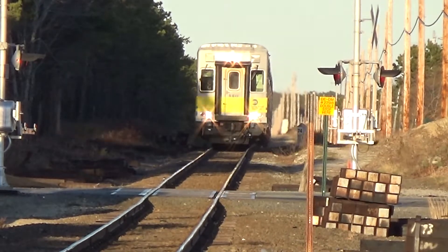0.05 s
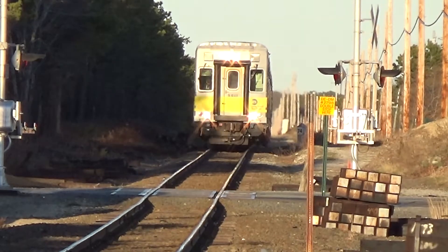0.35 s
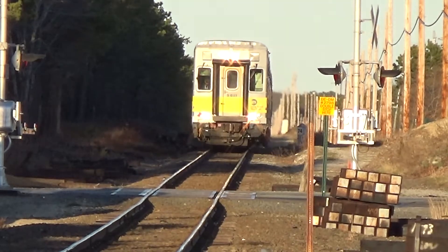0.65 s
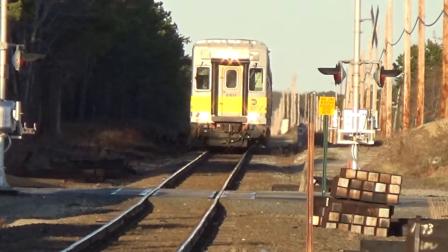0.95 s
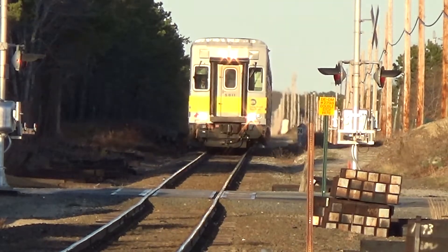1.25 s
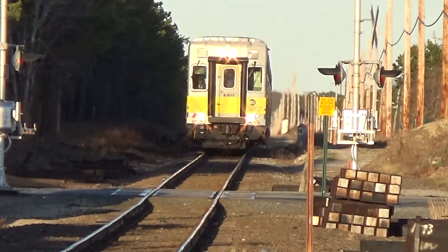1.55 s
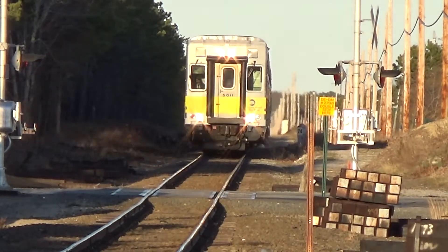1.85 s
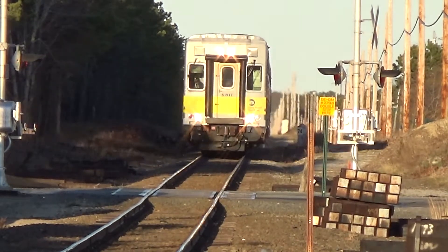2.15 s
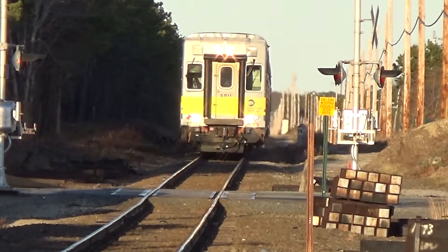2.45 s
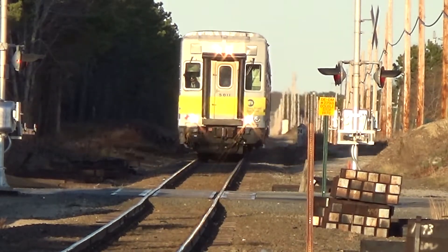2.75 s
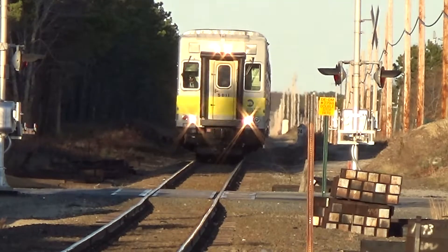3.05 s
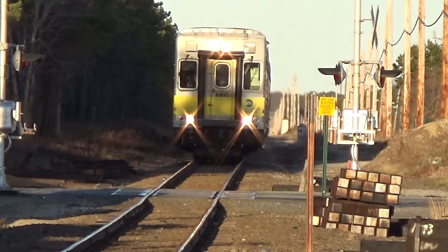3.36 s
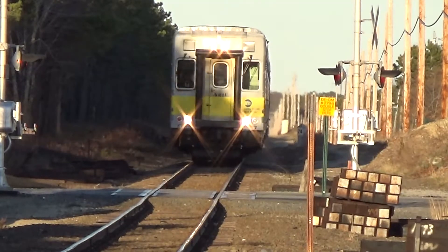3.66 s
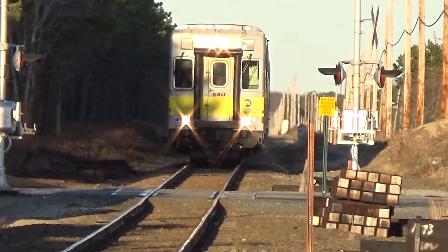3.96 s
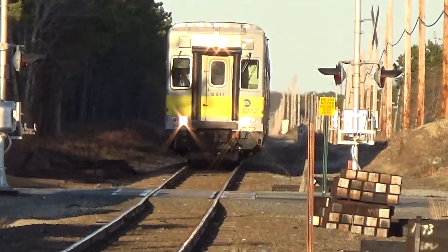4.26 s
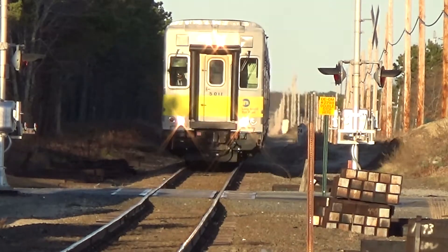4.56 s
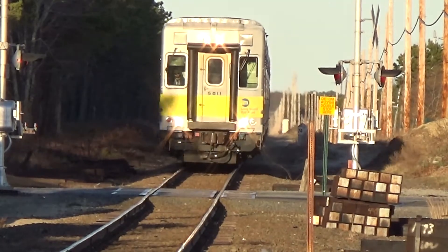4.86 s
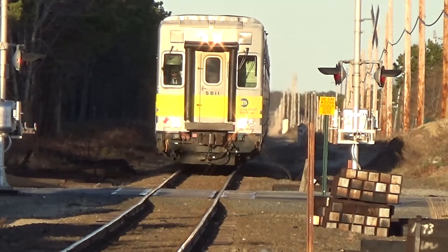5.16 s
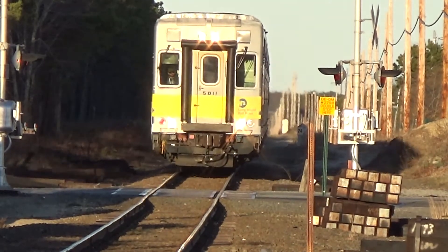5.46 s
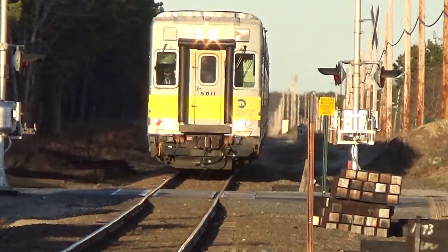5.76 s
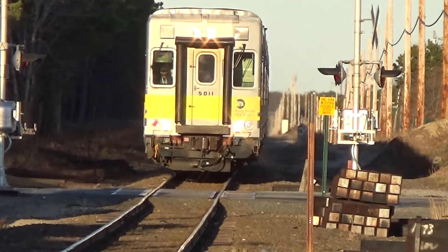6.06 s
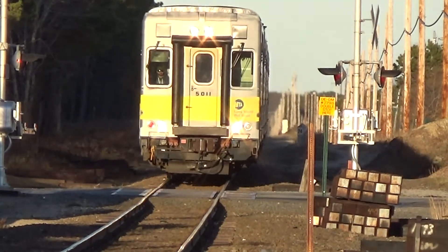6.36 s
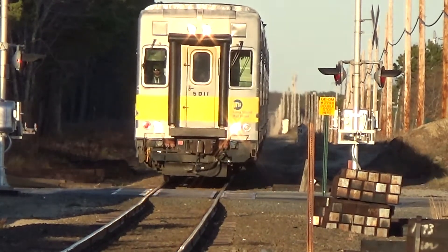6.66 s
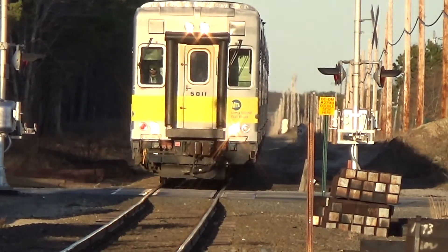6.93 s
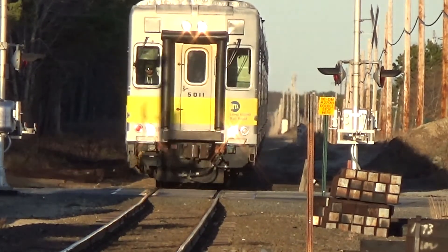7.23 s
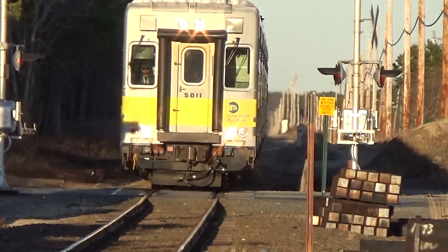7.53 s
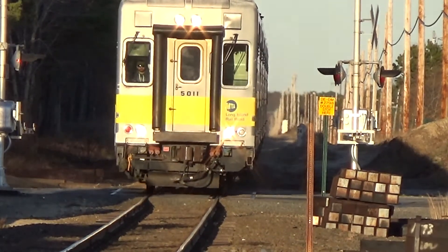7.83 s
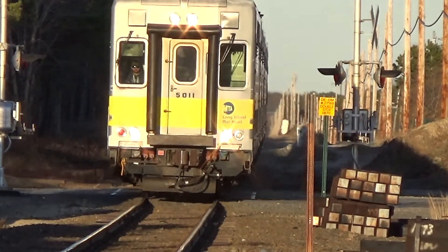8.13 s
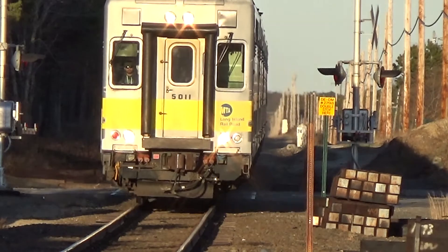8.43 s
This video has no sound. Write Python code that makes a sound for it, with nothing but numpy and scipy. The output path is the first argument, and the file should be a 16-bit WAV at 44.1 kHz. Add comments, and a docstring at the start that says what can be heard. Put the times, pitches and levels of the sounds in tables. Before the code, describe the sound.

Faint wheel rumble, outdoor hiss and soft camera ticking come first. After about three seconds an approaching train sounds its raspy two-note air horn: two short, spaced blasts, then a quick toot running into a longer, brighter blast. Each one echoes through the surrounding woods and lingers, slightly lower in pitch. Light gusts brush the microphone beside the track.

```python
"""A commuter train's two-bell air horn sounds four times as it nears a level crossing through woods.
Air-driven diaphragms give two harmonic series, their sum tones and a rasp. Trees throw the blasts back,
lower in pitch the further behind the moving train they stand. Far wheels rumble under hiss and two faint
tones, gusts brush the microphone, and a camera's lens motor ticks."""
import sys
import numpy as np
from scipy import signal
from scipy.fft import rfft, irfft, next_fast_len
from scipy.io import wavfile

SR = 44100
rng = np.random.default_rng(int(sys.argv[2]) if len(sys.argv) > 2 else 0)


def to_wav(s):
    """Save 16-bit WAV."""
    ch = np.atleast_2d(s).T  # columns
    pcm = np.round(np.clip(ch, -1, 1) * 32767)  # PCM
    wavfile.write(sys.argv[1], SR, pcm.astype(np.int16))


N = 374409

# distant wheels (time [s], level [dB])
WHEEL_LEVEL = [(0, -62.5), (.6, -62.5), (1.5, -66), (2.5, -65), (3.4, -63), (5, -56), (6.5, -58),
               (7.1, -57), (8.49, -49)]
# hiss (time [s], relative level [dB])
HISS_CONTOUR = [(0.0, -73), (2.03, -75), (2.81, -76), (3.83, -74.5), (4.16, -73.5), (4.7, -73.5),
                (5.63, -71), (6.36, -73.5), (7.21, -73.5), (7.61, -72), (8.49, -70)]
# noise spectra (frequency [Hz], relative density [dB])
WHEEL_SPECTRUM = [(88, -31), (150, -28.5), (370, -13), (404, -8), (458, -10.5), (506, -3.5), (566, -7.5),
                  (983, -8.5), (1660, -20.5), (3000, -25.5), (3900, -35.5), (6600, -120)]
HISS_SPECTRUM = [(1000, 9.5), (2500, 4), (4000, 4.5), (6000, 2.5), (9000, 1.5), (12000, -0.5),
                 (15500, -1.5)]
WIND_SPECTRUM = [(15, -59), (25, -32), (75, -3), (114, -4.5), (173, -1.5), (237, -5), (325, -5.5),
                 (479, -13.5), (657, -22), (900, -31), (1170, -45), (1980, -120)]
RUSH_SPECTRUM = [(300, -22), (700, 6.5), (2800, -5.5), (4600, -6), (5600, -37), (7000, -32), (10000, -35.5),
                 (13000, -66.5)]
# stereo width (frequency [Hz], side gain [dB])
AIR_SIDE = [(60, -10.5), (200, -9.5), (400, -17.5), (700, -11), (1300, -5.5), (2400, -4.5), (4400, -5),
            (8000, -12), (10000, -26.5), (15000, -19.5)]
WIND_SIDE = [(60, -15), (110, -10), (200, -8.5), (380, -4.5), (700, 3.5)]
HORN_SIDE = [(400, -13.5), (900, -14.5), (1400, -13), (2500, -10.5), (4400, -28), (8000, -39.5)]
ECHO_SIDE = [(380, -7.5), (700, -1.5), (1300, -0.5), (2400, 3.5), (4400, -2.5), (9000, -7.5)]
# far tones (start [s], stop [s], start pitch [Hz], end pitch [Hz], level [dB])
FAR_GLIDES = [(1.98, 2.188, 497, 502, -67.5), (3.107, 3.47, 2820, 2680, -76.5)]
# lens motor (start [s], stop [s], tick level [dB], tick pitch [Hz])
MOTOR_RUNS = [(0.029, 1.397, -59, 3400), (1.898, 4.0, -61.5, 3480), (4.367, 5.02, -58.5, 3450),
              (5.033, 8.45, -62.5, 3595)]
# camera clicks (time [s], peak [dB], low cut [Hz])
HOUSING_CLICKS = [(1.415, -46.5, 1800), (1.865, -50, 1490), (4.017, -46.5, 1850), (5.582, -48.5, 7980),
                  (5.601, -45, 6800)]
# camera housing (frequency [Hz], bandwidth [Hz], gain [dB])
HOUSING_MODES = [(2540, 240, 1), (3180, 280, 3.5), (6000, 2200, -18), (9100, 510, -15)]
# breeze (time [s], level [dB])
BREEZE_LEVEL = [(0, -57), (0.65, -60.5), (1.1, -62), (1.9, -73.5), (2.9, -83.5), (3.8, -75), (4.6, -66),
                (5.4, -62), (5.85, -67.5), (6.5, -68), (7.0, -71), (7.15, -56.5), (7.9, -68), (8.49, -72)]
# gusts (centre [s], length [s], peak [dB])
WIND_GUSTS = [(0.216, 0.055, -50), (0.356, 0.049, -54), (0.482, 0.031, -50.5), (0.95, 0.08, -64),
              (3.12, 0.14, -68), (3.517, 0.11, -66), (3.66, 0.034, -62), (4.198, 0.03, -58),
              (4.353, 0.069, -56.5), (4.63, 0.11, -48.5), (4.717, 0.062, -45), (4.772, 0.063, -41),
              (4.838, 0.057, -40.5), (4.903, 0.046, -49), (5.068, 0.1, -42), (5.191, 0.043, -42.5),
              (5.283, 0.04, -64), (5.471, 0.063, -47.5), (5.73, 0.1, -61.5), (5.97, 0.065, -65),
              (6.235, 0.086, -56.5), (6.397, 0.032, -58), (6.546, 0.05, -57), (6.747, 0.075, -57),
              (6.82, 0.083, -47.5), (7.227, 0.1, -63), (7.37, 0.053, -61)]
# reflection filters (frequency [Hz], gain [dB])
TREE_FILTER = [(320, 1), (460, 6.5), (660, 5.5), (950, 1.5), (1400, 4.5), (2000, -7.5), (2800, -5),
               (3600, -8), (5000, -7.5), (10000, -12)]
SLAP_FILTER = [(500, 1), (950, -1.5), (1400, -0.5), (2000, -8), (3000, -11), (5000, -18), (8000, -14)]
# tree echo strength (angle from ahead [deg], relative level [dB])
ECHO_BY_ANGLE = [(0, 10.5), (20, 3), (50, 3), (90, 0), (130, -19.5), (180, 7.5)]
# strong single reflectors (delay [s], angle from ahead [deg], gain [dB])
SURFACES = [(.12, 89, -8.5), (.24, 120, -10), (.33, 165, -14)]
# the bells beam treble ahead (angle from ahead [deg], cutoff [Hz])
BEAM_CUTOFF = [(0, 7000), (50, 11400), (90, 1840), (130, 1200), (180, 1770)]
# two overtone bands on the direct path (time [s], bite gain [dB], blare gain [dB])
BAND_SWELLS = [(3.47, -5.5, -0.5), (3.55, 4.5, 3), (3.64, 8.5, 6), (3.7, 1.5, 0), (5.02, -1, -1),
               (5.17, 1, -0.5), (7.24, -8.5, -1), (7.48, -1, 2.5), (7.58, -12, -0.5), (7.65, -1, 3.5),
               (7.74, 9.5, -4.5), (7.82, 2, -5.5)]
# first harmonics, a row each (far level [dB], near level [dB])
HIGH_HARMONICS = [(-13.5, -18), (2, -11), (-17.5, -8), (-14, -5.5), (-17, -7.5), (-13.5, -15), (-16, -20.5),
                  (-20.5, -23), (-27.5, -28), (-38.5, -27.5), (-33.5, -39), (-40, -37)]
LOW_HARMONICS = [(-28.5, -21), (-15.5, -14.5), (-13.5, -8.5), (-10.5, -14), (-16, -14.5), (-17, -11.5),
                 (-21, -19.5), (-18, -21), (-26, -23), (-15.5, -32), (-23.5, -23.5), (-42, -26.5)]
# envelopes of higher harmonics and of sum tones (frequency [Hz], level [dB])
UPPER_HARMONICS = [(4000, -30.5), (5000, -29.5), (6000, -40.5), (7000, -52), (8500, -54.5), (10500, -61.5),
                   (12000, -86)]
SUM_ENVELOPE = [(780, -23.5), (1500, -22), (2700, -21.5), (3500, -26.5), (4500, -31), (6000, -41.5),
                (8000, -48), (10500, -67), (12000, -91.5)]
# low bell's harmonics 1, 2, ... in the sum tones (weight [dB])
SUM_WEIGHTS_DB = [-11.5, 0.5, -2, -7.5, -6, -8, -8, -8]
# blasts (full tone [s], valve shuts [s], high bell pitch [Hz], starts sharp by [Hz], direct gain [dB],
# nearness [0-1], body [dB], blare [dB], rasp [dB], edge [dB], fizz [dB], echo gain [dB])
HORN_BLASTS = [ (3.458, 3.688, 460.3, 18.5, -27.5, 0.27, -3, 0.5, -2, -6, -14, -37),
               (5.007, 5.166, 460.9, 12.27, -24.5, 0.23, 3.0, -0.5, 2.5, -3, -7.5, -31),
               (7.187, 7.283, 459.8, 13.55, -18, 0.49, -7.5, -8.5, -1.5, 2, -1.5, -25.5),
               (7.436, 7.815, 459.5, 5.94, -21.5, 0.94, 1.5, -3.5, 0.5, 1.5, 3.5, -25), ]

TRAIN_MACH = .066
LOW_BELL_RATIO = .7195
LEAD_S = .025  # onset to full tone


def from_db(db):
    """Decibels to amplitude."""
    return 10 ** (np.asarray(db) / 20)


def unit_rms(x):
    """Scales to rms 1."""
    return x / np.sqrt(np.mean(x ** 2) + 1e-20)


def lookup(rows, at):
    """Interpolates the other columns along the first."""
    axis, *columns = np.transpose(rows)
    return [np.interp(at, axis, column) for column in columns]


def at_hz(points, hz):
    """Reads a spectrum on a log-frequency axis."""
    f, value = np.transpose(points)
    return np.interp(np.log(np.maximum(hz, 1)), np.log(f), value)


def drift(rate_hz, size=N):
    """Smooth random wander, rms about 1."""
    r = np.exp(-200 * np.pi * rate_hz / SR)
    slow = signal.lfilter([1], [1, -2 * r, r * r], rng.standard_normal(N // 100 + 1002))[1000:]
    return np.interp(np.arange(size) / 100, np.arange(len(slow)), unit_rms(slow))


def coloured(x, spectrum):
    """Zero-phase filter with a smooth spectrum."""
    size = next_fast_len(x.shape[-1])
    gain = from_db(at_hz(spectrum, np.fft.rfftfreq(size, 1 / SR)))
    return irfft(rfft(x, size) * gain, size)[..., :x.shape[-1]]


def stereo(mid, side, width):
    """Left and right from mid and filtered side."""
    side = coloured(side, width)
    return np.array([mid + side, mid - side])


def stereo_noise(spectrum, width):
    """Coloured stereo noise, rms 1."""
    mid, side = rng.standard_normal((2, N))
    return unit_rms(coloured(stereo(mid, side, width), spectrum))


def resonance(x, hz, width_hz):
    """Two-pole resonator, peak gain 1."""
    r = np.exp(-np.pi * width_hz / SR)
    feedback = [1, -2 * r * np.cos(2 * np.pi * hz / SR), r * r]
    return signal.lfilter(np.array([1, 0, -1]) * (1 - r * r) / 2, feedback, x + 1e-18)


def add(track, sound, start_s):
    """Mixes a sound into a track."""
    i = min(max(int(start_s * SR), 0), N)
    track[..., i:i + sound.shape[-1]] += sound[..., :N - i]


def hiss(t, gain_db=6.5):
    """Even outdoor hiss."""
    return from_db(lookup(HISS_CONTOUR, t)[0] + gain_db) * stereo_noise(HISS_SPECTRUM, AIR_SIDE)


def wheels(t):
    """Far wheels roll on the rails, louder towards the end."""
    return from_db(lookup(WHEEL_LEVEL, t)[0]) * stereo_noise(WHEEL_SPECTRUM, AIR_SIDE)


def far_tones(waver=.0036):
    """Two thin, wavering tones swell and fade."""
    out = np.zeros(N)
    for start_s, stop_s, start_hz, end_hz, db in FAR_GLIDES:
        size = int((stop_s - start_s) * SR)
        hz = np.linspace(start_hz, end_hz, size) * (1 + waver * drift(40, size))
        tone = np.sin(2 * np.pi * np.cumsum(hz) / SR)
        add(out, from_db(db) * signal.windows.tukey(size, .5) * tone, start_s)
    return out


def lens_motor(period_s=1001 / 30000, rise_s=.0012, scatter_hz=60, uneven_db=2, right_phase_rad=.57):
    """The motor ticks once a period: a short chirp with a dry rattle."""
    out = np.zeros((2, N))
    t = np.arange(SR // 25) / SR
    variation = rng.standard_normal((N // 1000, 2))
    grit = rng.standard_normal((N // 1000, 2, len(t)))
    envelope = t / rise_s * np.exp(1 - t / rise_s)
    phase_rad = np.array([[0], [right_phase_rad]])
    for start_s, stop_s, db, tick_hz in MOTOR_RUNS:
        for time_s in np.arange(start_s, stop_s, period_s):
            tick = int(time_s / period_s)
            force, speed = variation[tick]
            chirp = envelope * np.sin(2 * np.pi * (tick_hz + scatter_hz * speed) * t + phase_rad)
            rattle = from_db(-3) * resonance(envelope * grit[tick], hz=2600, width_hz=700)
            add(out, from_db(db + uneven_db * force) * (chirp + rattle), time_s)
    return out


def housing_clicks(decay_s=.0028):
    """Sharp clicks ring the camera housing."""
    out = np.zeros(N)
    t = np.arange(SR // 25) / SR
    for time_s, peak_db, low_cut_hz in HOUSING_CLICKS:
        burst = rng.standard_normal(len(t)) * np.exp(-t / decay_s)
        ring = sum(from_db(db) * resonance(burst, hz, width_hz) for hz, width_hz, db in HOUSING_MODES)
        click = signal.sosfilt(signal.butter(2, [low_cut_hz, 11500], "band", fs=SR, output="sos"), ring)
        add(out, from_db(peak_db) * click / np.abs(click).max(), time_s)
    return out


def wind(t, flutter_db=1.7, eddy_db=1.6):
    """Breeze and gusts on the microphone; eddies make both lumpy."""
    breeze = from_db(lookup(BREEZE_LEVEL, t)[0] + flutter_db * drift(12))
    gusts = sum(from_db(db) / (1 + (2 * (t - centre_s) / length_s) ** 4)
                for centre_s, length_s, db in WIND_GUSTS)
    eddies = unit_rms(stereo_noise(WIND_SPECTRUM, WIND_SIDE) * from_db(eddy_db * drift(28)))
    return np.hypot(breeze, gusts) * eddies


def reflectors(trees=280, t60_s=3.42, early_db=4, early_s=.27):
    """Delay, angle and gain of each echo: random trees plus a few strong surfaces."""
    strata = (np.arange(trees) + rng.random(trees)) / trees
    delay_s = .02 + 1.9 * strata ** 1.8
    ahead_bias = np.interp(delay_s, [0, .3], [1, 1.6])  # late echoes come more from ahead
    angle_deg = 180 * rng.random(trees) ** ahead_bias
    decay_db = early_db * np.exp(-delay_s / early_s) - 60 * delay_s / t60_s
    gain = from_db(lookup(ECHO_BY_ANGLE, angle_deg)[0] + decay_db)
    gain = gain / np.linalg.norm(gain) * rng.choice([-1, 1], trees)
    surface_s, surface_deg, surface_db = np.transpose(SURFACES)
    return np.r_[delay_s, surface_s], np.r_[angle_deg, surface_deg], np.r_[gain, from_db(surface_db)]


def woods(blast, dulling_s=.065, spread_db=7, oversample=16):
    """Echoes; sound sent sideways or backwards loses the Doppler rise of sound sent ahead."""
    out = np.zeros((2, 3 * SR))
    fine = signal.resample_poly(coloured(blast, TREE_FILTER), oversample, 1)
    for delay_s, angle_deg, gain in zip(*reflectors()):
        doppler = (1 - TRAIN_MACH) / (1 - TRAIN_MACH * np.cos(np.radians(angle_deg)))
        echo = fine[np.arange(0, len(fine) - 1, oversample * doppler).astype(int)]
        # long paths lose treble
        cutoff_hz = lookup(BEAM_CUTOFF, angle_deg)[0] / np.sqrt(1 + delay_s / dulling_s)
        r = np.exp(-2 * np.pi * cutoff_hz / SR)
        echo = signal.lfilter([(1 - r) ** 2], [1, -2 * r, r * r], echo + 1e-18)
        pan_db = spread_db * rng.standard_normal()
        sides = from_db([[pan_db / 2], [-pan_db / 2]])
        add(out, gain * sides / sides.mean() * echo, delay_s)
    return out


def direct_path(blast, start_s, body_db, blare_db, rasp_db, edge_db, fizz_db):
    """The path along the ground colours each blast; two overtone bands swell and fade."""
    blast = coloured(blast, [(680, body_db), (880, 0), (1400, 0), (1700, blare_db), (2400, blare_db),
                             (2750, 0), (3200, rasp_db), (3900, rasp_db), (4500, edge_db),
                             (6000, edge_db), (7000, fizz_db)])

    def swell(gain_db, hz, width_hz):
        band = coloured(blast, [(hz + k * width_hz / 2, -abs(k) ** 3) for k in range(-4, 5)])
        return (from_db(gain_db) - 1) * band

    bite_swell_db, blare_swell_db = lookup(BAND_SWELLS, start_s - LEAD_S + np.arange(len(blast)) / SR)
    bite = swell(bite_swell_db, hz=2790, width_hz=190)
    blare = swell(blare_swell_db, hz=2140, width_hz=750)
    return blast + bite + blare


def off_axis(x):
    """Source slightly to the right: the left channel lags in phase."""
    quadrature = signal.hilbert(x, next_fast_len(len(x))).imag[:len(x)]
    return stereo(x, quadrature, HORN_SIDE)


def partials(high_hz, nearness):
    """Harmonics, and the sum tones of very loud air, as (high order, low order, level [dB])."""
    def level_db(bell, order, hz):
        if order <= len(bell):
            return np.interp(nearness, [0, 1], bell[order - 1])
        return at_hz(UPPER_HARMONICS, order * hz)

    low_hz = high_hz * LOW_BELL_RATIO
    high = [(i, 0, level_db(HIGH_HARMONICS, i, high_hz)) for i in range(1, 25)]
    low = [(0, j, level_db(LOW_HARMONICS, j, low_hz)) for j in range(1, 34)]
    sums = [(i, j, at_hz(SUM_ENVELOPE, i * high_hz + j * low_hz) + db)
            for i in range(1, 22) for j, db in enumerate(SUM_WEIGHTS_DB, 1)]
    return high + low + sums


def air_horn(start_s, shut_s, high_hz, sharp_hz, nearness, attack_db_per_s=1400, release_db_per_s=300,
             sag_hz_per_s=3.76, jitter=.0016, build_s=.062, brighten_db_per_s=6.5, knee_hz=1990,
             low_lag_s=.021, rush_db=-23):
    """One blast: both diaphragms start sharp, settle and sag; building pressure turns the tone brassy."""
    size = int((shut_s - start_s + .2) * SR)
    t = start_s - LEAD_S + np.arange(size) / SR
    age_s = np.maximum(t - start_s, 0)

    def diaphragm_phase(ratio, settle_s):
        hz = high_hz + sharp_hz * np.exp((start_s - t) / settle_s) - sag_hz_per_s * age_s
        return 2 * np.pi * np.cumsum(ratio * hz * (1 + jitter * drift(23, size))) / SR

    high_phase = diaphragm_phase(1, settle_s=.0343)
    low_phase = diaphragm_phase(LOW_BELL_RATIO, settle_s=.0542)
    dull_db = 6.5 * np.exp(-age_s / build_s)
    valve_db = attack_db_per_s * np.maximum(start_s - t, 0) + release_db_per_s * np.maximum(t - shut_s, 0)
    late_db = 14 * np.clip(1 - age_s / low_lag_s, 0, 1)
    shimmer_db = [2.36 * drift(7, size) for _ in range(13)]
    tone = np.zeros(size)
    for k, (high_order, low_order, db) in enumerate(partials(high_hz, nearness)):
        hz = (high_order + low_order * LOW_BELL_RATIO) * high_hz
        if low_order:  # low bell and sum tones: later, duller
            db = db - late_db - 3 * np.clip(hz / 3000 - 1, 0, 1)
        tilt_db_per_octave = brighten_db_per_s * age_s - dull_db * (1 if low_order else .74)
        db = db + tilt_db_per_octave * max(np.log2(hz / knee_hz), 0)
        db -= valve_db * (1 + hz / 5000)  # treble comes last, dies first
        db += min(hz / 2500, 1.5) * shimmer_db[k % len(shimmer_db)]  # moving air sways treble most
        phase = high_order * high_phase + low_order * low_phase + rng.uniform(0, 2 * np.pi)
        tone += from_db(db) * np.sin(phase)
    # the high diaphragm chops rushing air into a rasp
    rush = coloured(rng.standard_normal(N)[:size], RUSH_SPECTRUM)
    rasp = unit_rms(rush * (1 + np.cos(high_phase)))
    return tone + rasp * from_db(rush_db - dull_db - late_db - 2 * valve_db)


def train_horn(pan_right_db=1, echo_nearness=.86, slap_s=.092, slap_db=-11):
    """Four blasts: direct sound, a dull slap from nearby, and echoes carrying the fuller close tone."""
    out = np.zeros((2, N))
    for start_s, shut_s, hz, sharp_hz, direct_db, nearness, *colour_db, echo_db in HORN_BLASTS:
        blast = air_horn(start_s, shut_s, hz, sharp_hz, nearness)
        direct = from_db(direct_db) * direct_path(blast, start_s, *colour_db)
        left, right = woods(air_horn(start_s, shut_s, hz, sharp_hz, echo_nearness))
        echoes = stereo((left + right) / 2, (left - right) / 2, ECHO_SIDE)
        onset_s = start_s - LEAD_S
        add(out, off_axis(direct), onset_s)
        add(out, from_db(slap_db) * coloured(direct, SLAP_FILTER), onset_s + slap_s)
        add(out, from_db(echo_db) * echoes, onset_s)
    return out * from_db([[-pan_right_db / 2], [pan_right_db / 2]])


def scene():
    """Stereo mix of all sources."""
    t = np.arange(N) / SR
    return train_horn() + wind(t) + wheels(t) + hiss(t) + lens_motor() + housing_clicks() + far_tones()


def record(dry):
    """Steep low-pass at 15750 Hz."""
    return signal.sosfilt(signal.ellip(12, .1, 90, 15750, fs=SR, output="sos"), dry)


dry = scene()
out = record(dry)
to_wav(out)
```